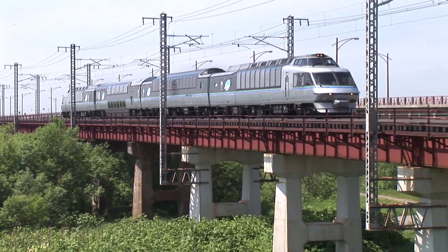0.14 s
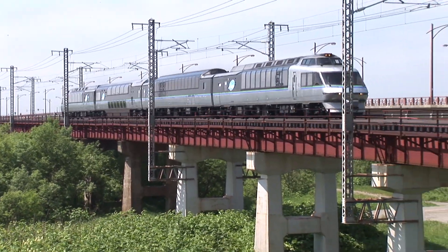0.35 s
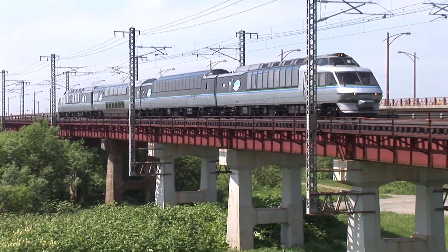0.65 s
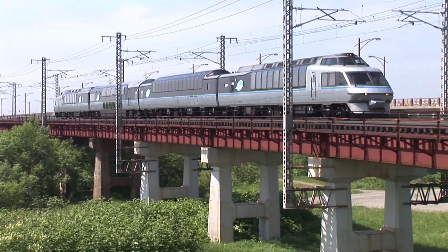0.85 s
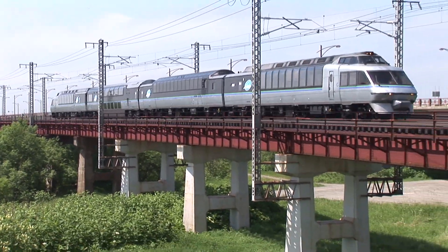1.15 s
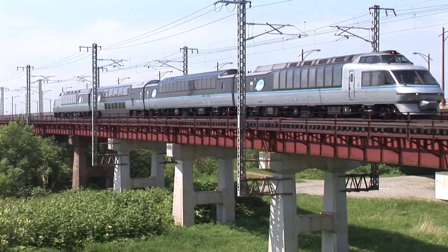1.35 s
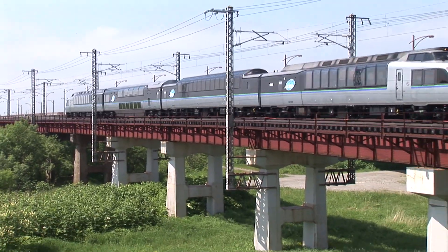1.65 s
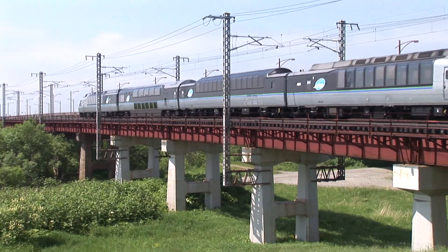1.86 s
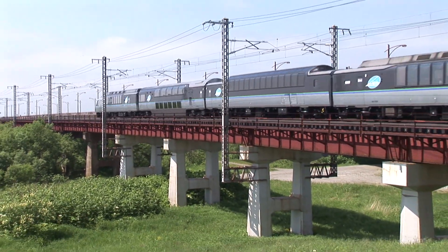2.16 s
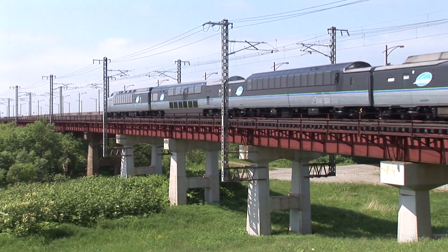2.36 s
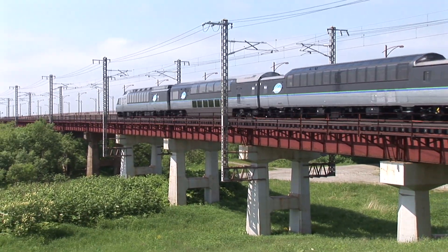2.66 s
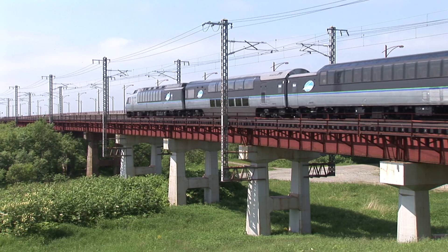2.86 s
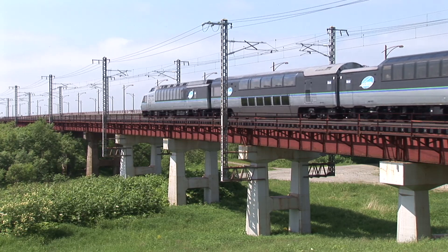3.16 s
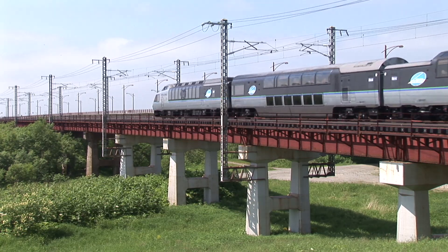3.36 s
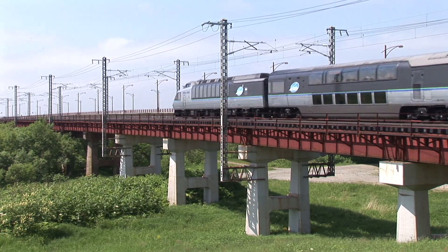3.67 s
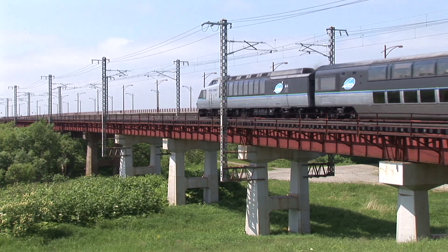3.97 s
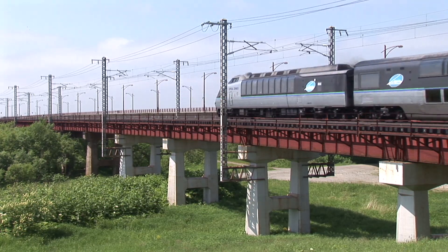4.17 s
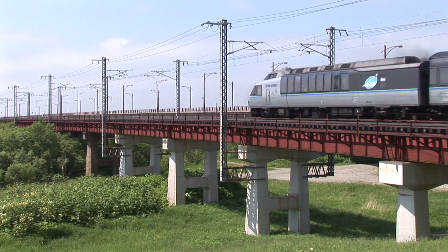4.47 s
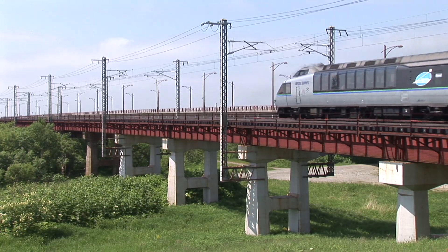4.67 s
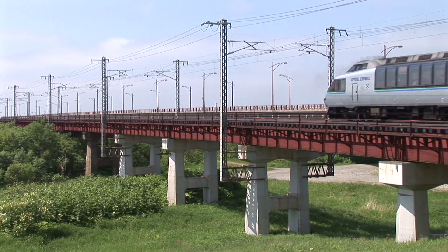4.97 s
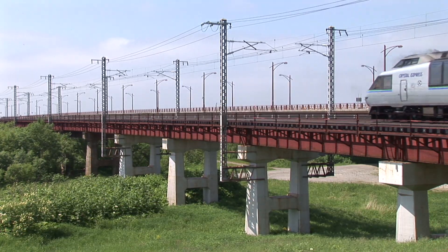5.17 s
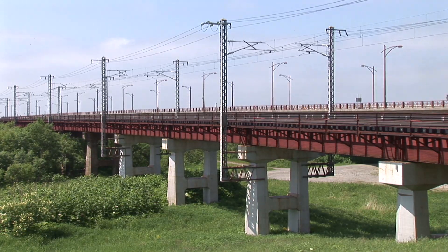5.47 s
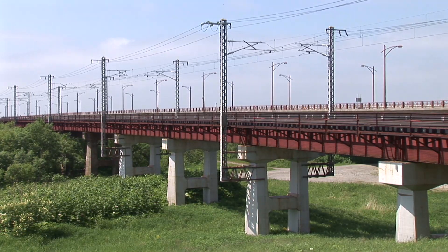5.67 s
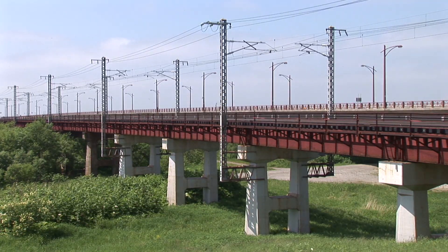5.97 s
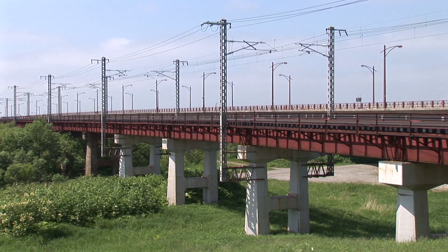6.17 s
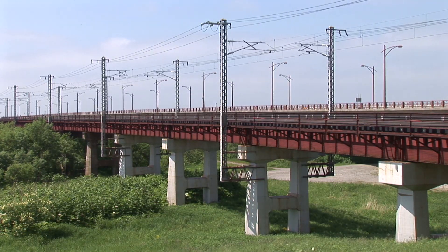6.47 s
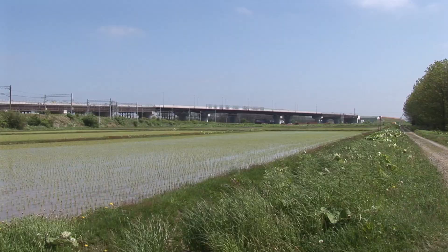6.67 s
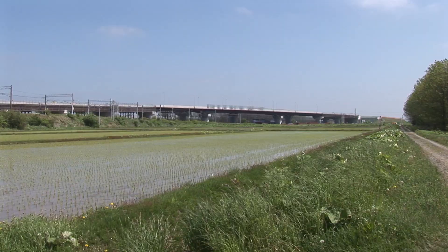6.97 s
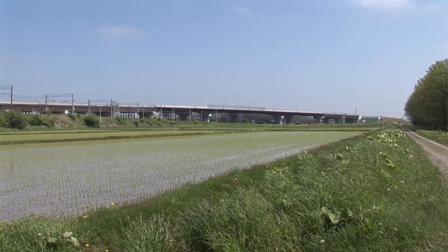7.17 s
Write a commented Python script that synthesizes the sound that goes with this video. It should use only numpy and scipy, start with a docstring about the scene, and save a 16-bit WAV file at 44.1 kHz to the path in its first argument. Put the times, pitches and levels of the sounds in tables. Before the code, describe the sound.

A diesel train approaches over a steel girder bridge, heard outdoors from beside it. Engine hum and wheel roar grow over a deep rumbling structure. From about two seconds, axles clack in quick groups over a rail joint, with rebounds and brief metallic rings. The roar moves from ahead to the right and fades, then cuts sharply to a very quiet field with faint distant rumble.

```python
"""A steel girder bridge: a diesel train rolls over it from ahead to the right, then a cut to a quiet field.
Shaped noise makes the rumbling girders, booming deck and roaring, hissing wheels; sine tones make the engines' hum.
Each axle clacks over a rail joint with a noise burst and two rebounds, and its wheel rings in fading tones.
The field is soft noise with a far rumble that swells and sinks.
The microphone is a pair of ports: their sum and their difference make left and right."""
import sys
import numpy as np
from scipy import signal
from scipy.fft import rfft, irfft, next_fast_len
from scipy.io import wavfile
from scipy.ndimage import uniform_filter1d

SR = 44100
rng = np.random.default_rng(int(sys.argv[2]) if len(sys.argv) > 2 else 0)


def boost(x):
    """Linear amplitude factor 10**(x/20) for a level x in decibels (scalar or array-like)."""
    u = np.asarray(x, float) / 20
    return 10 ** u


def dump(signal):
    """Clip the signal to [-1, 1] and save it as 16-bit WAV at the path in sys.argv[1]."""
    limited = np.clip(np.atleast_2d(signal).T, -1, 1)
    pcm = np.round(limited * 32767).astype(np.int16)
    wavfile.write(sys.argv[1], SR, pcm)


N = 322797
T = np.arange(N) / SR


def evened(x):
    """Scales to rms 1."""
    return x / np.sqrt(np.mean(x ** 2) + 1e-20)


def read(points, hz, axis=1):
    """Reads a table column at any frequency, on a log-frequency axis."""
    table = np.transpose(points)
    return np.interp(np.log(hz + 1), np.log(table[0] + 1), table[axis])


def along(rows, axis=1, t=T):
    """Reads a table column at times t."""
    table = np.transpose(rows)
    return np.interp(t, table[0], table[axis])


def noise():
    """Two rows of plain random noise."""
    return rng.standard_normal((2, N))


def coloured(x, points):
    """Filters x by a spectrum and scales to rms 1."""
    size = next_fast_len(N)
    gain = boost(read(points, np.fft.rfftfreq(size, 1 / SR)))
    return evened(irfft(rfft(x, size) * gain, size)[..., :N])


def filtered(x, hz, kind="low"):
    """Keeps the part below hz, or above it with kind "high", without delay."""
    return signal.sosfiltfilt(signal.butter(2, hz, kind, fs=SR, output="sos"), x)


def wobble(per_s, depth_db):
    """Random level flutter: noise smoothed twice, with an rms depth in dB."""
    width = int(SR / per_s)
    smooth = uniform_filter1d(uniform_filter1d(rng.standard_normal(N), width), width)
    return boost(depth_db * evened(smooth))


# where the train is heard: (time [s], bearing [0 ahead - 1 right])
BEARING_ROWS = [(0, 0.074), (1.9, 0.078), (2.5, 0.36), (3.5, 0.52), (5.6, 0.64), (6.75, 1)]


def train_bearing(t=T):
    """The train's sound moves from ahead to the right."""
    return along(BEARING_ROWS, t=t)


# how near the train sounds: (time [s], level of the rolling roar [dB], level of the high hiss [dB])
NEARNESS = [(0, -37, -84), (.2, -34, -75), (.5, -36.5, -82), (1, -32, -77.5), (1.3, -30.5, -74),
            (2.1, -29, -71.5), (2.35, -27, -63), (2.6, -27.5, -70), (3, -27.5, -66), (3.7, -26.5, -61),
            (4.1, -27, -58), (4.55, -28, -62), (5, -28, -59.5), (5.4, -28.5, -62), (5.9, -30, -61.5),
            (6.65, -36.5, -65), (6.74, -36, -57)]


def nearness():
    """Levels in dB of the roar and of the hiss as the train passes."""
    return along(NEARNESS, axis=1), along(NEARNESS, axis=2)


# blows on the rail joint, one row a car; the levels are those of the blow's part above 900 Hz:
# (axle 1 level [dB], axle 2 level [dB], axle 3 level [dB], axle 4 level [dB])
BLOWS = [(-24.5, -25.5, -28.5, -29.5), (-26, -27, -26.5, -28), (-27, -24, -27.5, -25.5),
         (-26, -28, -27, -26.5)]
CAR_M, BOGIES_M, AXLES_M = 21.3, 14.4, 2.1  # car length, between bogies, between a bogie's axles
FIRST_AXLE_S, SPEED_M_S, GAIN_M_S2 = 2.245, 22.2, .14  # first axle on the joint, speed then, acceleration


def axles():
    """When each axle meets the joint, from its place in the slowly speeding train."""
    in_car = [0, AXLES_M, BOGIES_M, BOGIES_M + AXLES_M]
    metres = (CAR_M * np.arange(len(BLOWS))[:, None] + in_car).ravel()
    speed = np.sqrt(SPEED_M_S ** 2 + 2 * GAIN_M_S2 * metres)
    return FIRST_AXLE_S + (speed - SPEED_M_S) / GAIN_M_S2


LOAD_S = 0.11  # how long an axle loads the nearest span, either side of the joint


def load():
    """Axles on the nearest span, about their mean: it swells as the bogies of each coupling pass."""
    s = axles()
    on = sum(np.exp(-((T - each) / LOAD_S) ** 2) for each in s)
    over = np.clip(np.minimum(T - s[0], s[-1] - T) / LOAD_S + 1, 0, 1)
    mean = len(s) * LOAD_S * np.sqrt(np.pi) / (s[-1] - s[0])
    return on - over * mean


# colour of the girders' rumble and of the deck's boom: (frequency [Hz], level [dB per Hz, relative])
GIRDER_COLOUR = [(15, -46), (25, -12.5), (48, -2), (86, -3), (118, 0), (184, -7.5), (300, -24), (510, -120)]
DECK_COLOUR = [(120, -19), (290, -6), (350, -6.5), (406, -2.5), (449, 0.5), (540, -10.5), (600, -14.5),
               (780, -72)]
# the deck surges under the bogies and falls away behind the last: (time [s], level [dB])
DECK_LEVELS = [(0, -33), (.45, -34), (.68, -29.5), (1.2, -30), (1.42, -26.5), (1.65, -27.5), (2.35, -25),
               (2.7, -28), (2.95, -25.5), (3.35, -24.5), (3.6, -30.5), (3.88, -24.5), (4.07, -27),
               (4.28, -25), (4.52, -29.5), (4.9, -27), (5.65, -32), (5.84, -27.5), (5.95, -38), (6.74, -49)]
GIRDERS_DB, LOUDEST_DB, GIRDERS_FOLLOW = -29.5, -27, 0.4  # base level, at this roar level; dB per dB of roar
GIRDERS_LOAD_DB = 1  # swell per axle on the nearest span
GIRDERS_LEFT_DB, LEFT_S = -1, 0.07  # the girders quieten once the last axle has left, and how gradually


def bridge():
    """Rolling wheels shake girders and deck; two rows = the nearest part and the rest of the train."""
    near_db = nearness()[0] - LOUDEST_DB
    left = 1 - np.exp(-np.maximum(T - axles()[-1] - .04, 0) / LEFT_S)
    girders = coloured(noise(), GIRDER_COLOUR)
    # the deepest sway comes fully only with the train on the near spans
    far = np.clip(1 - train_bearing() / 0.3, 0, 1)
    girders = girders - .7 * far * filtered(girders, 75)
    follow_db = GIRDERS_FOLLOW * near_db + GIRDERS_LOAD_DB * load()
    girders = girders * boost(GIRDERS_DB + follow_db + GIRDERS_LEFT_DB * left)
    deck = coloured(noise(), DECK_COLOUR) * boost(along(DECK_LEVELS))
    return girders * wobble(11.4, 1.4) + deck * wobble(25, 0.66)


# colour of the rolling roar with the train ahead, passing and leaving, and of the high hiss:
# (frequency [Hz], level [dB per Hz, relative])
AHEAD_COLOUR = [(330, -27), (560, -1.5), (653, -12.5), (808, 2), (951, -10), (1110, 2), (1270, -14.5),
                (1440, -3.5), (2100, -4.5), (3740, -13.5), (4440, -30.5), (5090, -20.5), (5600, -35),
                (7280, -35.5), (11000, -78)]
PASSING_COLOUR = [(330, -34.5), (560, -9), (785, -1), (961, -7.5), (1120, 0.5), (1270, -10), (1500, 3),
                  (1690, -8), (2060, -2.5), (2330, -10.5), (2780, -7.5), (3150, -16), (3750, -15),
                  (4300, -25), (4950, -22), (5700, -39), (7300, -75)]
LEAVING_COLOUR = [(250, -4), (520, -2.5), (741, -2.5), (1020, -0.5), (1140, -10), (1400, 1), (1700, -7.5),
                  (1900, -1), (2350, -23), (2690, -4.5), (3000, -14.5), (3650, -11.5), (4300, -17.5),
                  (4900, -18), (5700, -31.5), (7300, -57)]
HISS_COLOUR = [(5000, -18), (5700, 5), (6200, -5), (6900, -20.5), (8400, 6), (9300, -21), (10000, 1.5),
               (11300, 5.5), (14200, 1.5), (14550, -25)]
ROAR_LOAD_DB, HISS_LOAD_DB = 0.86, 1  # swell per axle on the nearest span


def roar():
    """Wheel-on-rail noise whose colour turns with the bearing, in patches, gritty, with random level flutter."""
    gritty = noise() * wobble(160, .9)
    _, t, z = signal.stft(gritty, SR, nperseg=512, noverlap=384)
    hz = np.fft.rfftfreq(512, 1 / SR)
    bearing = train_bearing(t)
    ahead = np.clip((.45 - bearing) / 0.5, 0, 1)
    leaving = np.clip((bearing - .55) / 0.46, 0, 1)
    shape_db = np.outer(read(AHEAD_COLOUR, hz), ahead)
    shape_db += np.outer(read(PASSING_COLOUR, hz), 1 - ahead - leaving)
    shape_db += np.outer(read(LEAVING_COLOUR, hz), leaving)
    # air dulls the train while far
    shape_db -= np.outer(np.log2(1 + hz / 900), 3.4 * np.clip(1 - t / 1.9, 0, 1))
    patches = uniform_filter1d(rng.standard_normal(shape_db.shape), 4, 0)  # smooth over frequency
    patches = evened(uniform_filter1d(patches, 12, 1))  # and over time
    gain = boost(shape_db) / np.linalg.norm(boost(shape_db), axis=0) * boost(0.39 * patches)
    rolling = evened(signal.istft(z * gain, SR, nperseg=512, noverlap=384)[1][:, :N])
    roar_db, hiss_db = nearness()
    rolling = rolling * boost(roar_db + ROAR_LOAD_DB * load())
    hiss = coloured(noise(), HISS_COLOUR) * boost(hiss_db + HISS_LOAD_DB * load())
    return (rolling + hiss * wobble(45, 2.3)) * wobble(33, 0.38)


# firing tones of the leading engine's second order and the rear engine's first, before they waver and flutter:
# (time [s], frequency [Hz], level [dB])
LEAD_TONE = [(0, 113.1, -35.5), (.85, 110, -33), (.97, 105.3, -41), (1.1, 97.3, -33.5), (1.25, 87.4, -36.5)]
REAR_TONE = [(3, 59, -42), (3.45, 57.5, -31.5), (3.9, 57, -38), (6.74, 58, -38)]


def engine(rows, waver, flutter_db, order, next_db):
    """A firing tone and the next order, which waver in pitch and flutter at random in level."""
    hz = along(rows) * (1 + waver * evened(uniform_filter1d(rng.standard_normal(N), 4000)))
    fade = np.minimum(T - rows[0][0] + 0.0088, rows[-1][0] + 0.19 - T) / 0.16
    on = np.clip(fade, 0, 1)
    turns = 2 * np.pi * np.cumsum(hz) / SR
    tone = wobble(32, flutter_db) * np.sin(turns)
    next_tone = wobble(3.1, flutter_db) * np.sin((order + 1) / order * turns)
    return np.sqrt(2) * boost(along(rows, axis=2)) * on * (tone + boost(next_db) * next_tone)


# colour of a blow on the joint, before its treble is lowered: (frequency [Hz], level [dB per Hz, relative])
CLACK_COLOUR = [(150, -3.5), (900, -7), (1500, -10), (2100, -2), (3000, -10), (4200, -18), (4800, -16.5),
                (5500, -28.5), (6900, -48), (11300, -42.5), (14700, -43)]
# fainter single knocks: (time [s], level of the part above 900 Hz [dB])
FAINT_KNOCKS = [(1.917, -30.5), (2.794, -28), (6.419, -42), (6.6245, -43.5), (6.716, -42.5)]
# first rebound of each axle against its blow, one row a car:
# (axle 1 level [dB], axle 2 level [dB], axle 3 level [dB], axle 4 level [dB])
REBOUND_LEVELS = [(-2.5, -4, -1.5, -1.5), (-11.5, -7, -12, 1), (-14, -19, -2.5, -2), (-2.5, -2, -4, -10)]
RISE_S, FALL_S, BLOW_TREBLE_DB = 0.0095, 0.013, -3  # shape of a blow; change of its treble
REBOUND_S, REBOUND_FADE_DB = .018, -5  # the wheel bounces twice, this far apart, the second time weaker


def hit(u):
    """A blow rises and falls in a smooth bump around u = 0 s."""
    return np.exp(-np.where(u < 0, u / RISE_S, u / FALL_S) ** 2)


def clacks():
    """Each wheel drops over the gap with a gritty noise burst and two shorter rebounds."""
    clack = coloured(noise() * wobble(200, 2.4), CLACK_COLOUR)
    thud = filtered(clack, 2600)
    clack = thud + boost(BLOW_TREBLE_DB) * (clack - thud)
    knock = filtered(clack[0], 900, "high")
    blows = []
    for s, db, back_db in zip(axles(), np.ravel(BLOWS), np.ravel(REBOUND_LEVELS)):
        first = hit(1.5 * (T - s - REBOUND_S))
        second = hit(2 * (T - s - 2 * REBOUND_S))
        blows.append((db, hit(T - s) + boost(back_db) * (first + boost(REBOUND_FADE_DB) * second)))
    blows += [(db, hit(T - s)) for s, db in FAINT_KNOCKS]
    out = np.zeros((2, N))
    for db, shape in blows:
        evening = np.linalg.norm(shape) / np.linalg.norm(shape * knock)  # sets the level above 900 Hz
        out += boost(db) * shape * clack * evening
    return out


# the wheel's tones, before each wheel's random spread: (frequency [Hz], level [dB, relative])
WHEEL_TONES = [(1470, 2), (2050, -7), (2750, -13.5)]
# how hard those same wheels ring, one row a car:
# (axle 1 level [dB], axle 2 level [dB], axle 3 level [dB], axle 4 level [dB])
RING_LEVELS = [(-28, -25.5, -25, -26.5), (-34, -26, -25, -43), (-35, -28.5, -26, -32), (-21, -23, -24, -30)]
WHEEL_SPREAD, RING_RISE_S, RING_T60_S = 0.03, 0.011, 0.076  # pitch spread (share); swell; fall by 60 dB


def wheel_rings():
    """The blow makes each wheel ring at its own pitches, swelling and then dying away."""
    out = np.zeros((2, N))
    t = np.arange(0, .2, 1 / SR)
    swell = (1 - np.exp(-(t / RING_RISE_S) ** 2)) * boost(-60 * t / RING_T60_S)
    chance = rng.standard_normal((np.size(RING_LEVELS), len(WHEEL_TONES), 2))
    for s, db, draws in zip(axles(), np.ravel(RING_LEVELS), chance):
        ring = 0
        for (hz, own_db), (pitch, size) in zip(WHEEL_TONES, draws):
            tone = np.sin(2 * np.pi * hz * (1 + WHEEL_SPREAD * pitch) * t)
            ring = ring + boost(own_db + 1.8 * size) * tone
        at = round((s - RING_RISE_S) * SR)
        out[0, at:at + len(t)] += boost(db) * ring * swell / swell.max()
    return out


# colour of the quiet field: (frequency [Hz], level [dB per Hz, relative])
FIELD_COLOUR = [(25, 0.5), (111, 1.5), (582, -23), (2070, -24), (3000, -31), (4300, -43.5), (4900, -42),
                (5500, -55), (14700, -55.5)]
# the far rumble swells and sinks: (time [s], level [dB, relative])
RUMBLE_SWELLS = [(6.76, -12), (6.84, -4.5), (7, 1.5), (7.1, -5), (7.18, 6), (7.24, -2), (7.29, 3)]
FIELD_DB = -46.5  # level before the rumble swells


def field():
    """Soft noise whose part below 300 Hz is a far rumble with a changing level."""
    gust = boost(along(RUMBLE_SWELLS)) * wobble(30, 1.7)
    air = boost(FIELD_DB) * coloured(noise(), FIELD_COLOUR)
    return air + (gust - 1) * filtered(air, 300)


# width of the sound: left-right difference against the sum, very wide near 6-8 kHz;
# bearing and spread scale it: (frequency [Hz], level [dB, relative], phase [radians])
WIDTH = [(100, -41.5, 0), (260, -23, -1), (500, -11, -1.26), (900, -3.5, -1.86), (1400, -4.5, -2.5),
         (2400, -7, -2.5), (3400, -11.5, -2), (5340, -3.5, -2), (5900, 18, -1.5), (7200, 13, -1.5),
         (8600, 5.5, -2.5), (11200, -6.5, -1.5), (12500, -4, -3)]


def ports(pair, bearing, spread):
    """Sum port hears the source; difference port hears it by bearing, plus sound spread along the line."""
    size = next_fast_len(N)
    hz = np.fft.rfftfreq(size, 1 / SR)
    turn = boost(read(WIDTH, hz)) * np.exp(1j * read(WIDTH, hz, axis=2))
    side = irfft(rfft(bearing * pair[0] + spread * pair[1], size) * turn, size)[:N]
    return np.array([pair[0] + side, pair[0] - side])


def scene():
    """The train until the cut, then the field."""
    bearing = train_bearing()
    spread = .36 + bearing * (1 - bearing)  # the train is widest in passing
    train = ports(bridge() + roar(), 1.78 * bearing, spread)
    train = train + engine(LEAD_TONE, .012, 3, order=2, next_db=-6)
    train = train + engine(REAR_TONE, .04, 2.5, order=1, next_db=-5)
    train = train + ports(clacks() + wheel_rings(), 0.94, .4)
    before = np.clip((6.748 - T) / 0.0059, 0, 1)  # the cut: a crossfade of 5.9 ms
    return before * train + (1 - before) * ports(field(), 0.24, 0.94)


def roll_off(x):
    """The treble ends steeply here."""
    return signal.sosfilt(signal.butter(12, 14880, fs=SR, output="sos"), x)


def record(dry):
    """Turns the finished mix into the output sound."""
    return roll_off(dry)


dry = scene()
out = record(dry)
dump(out)
```